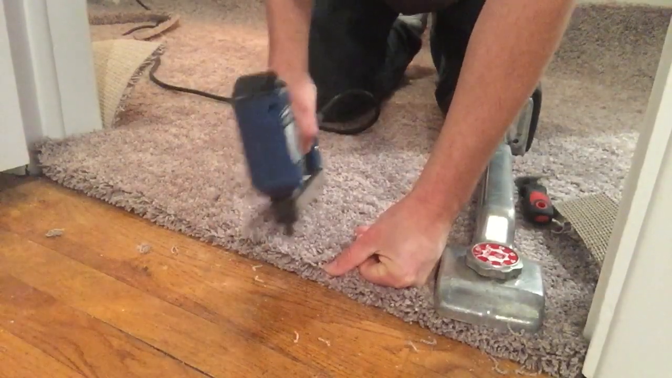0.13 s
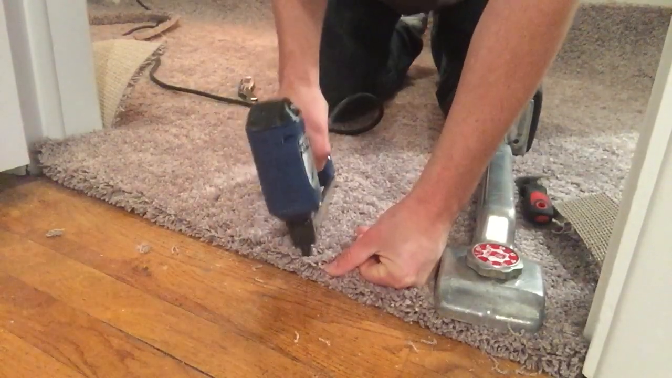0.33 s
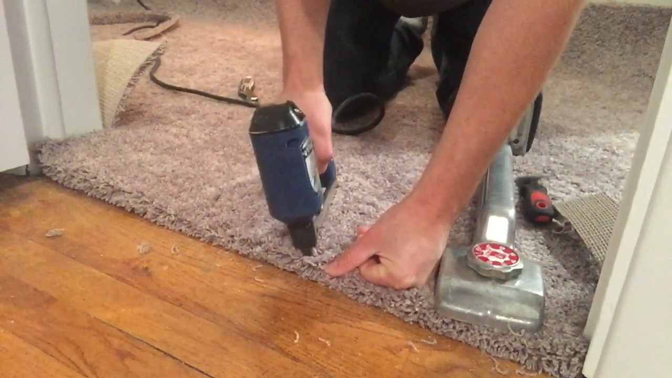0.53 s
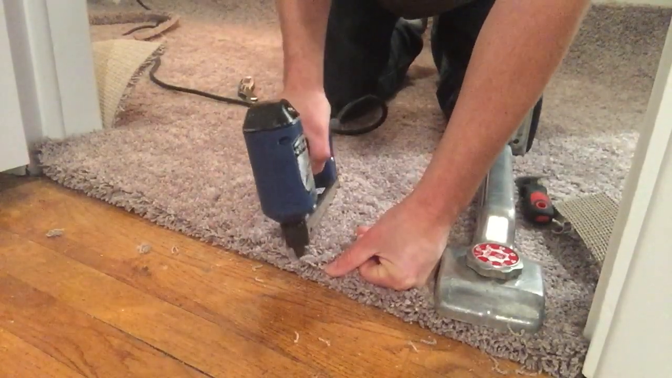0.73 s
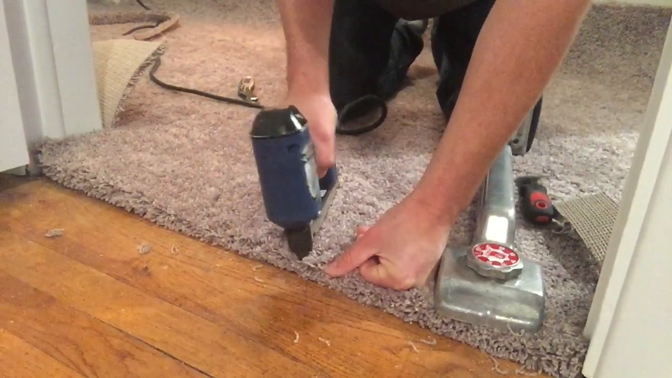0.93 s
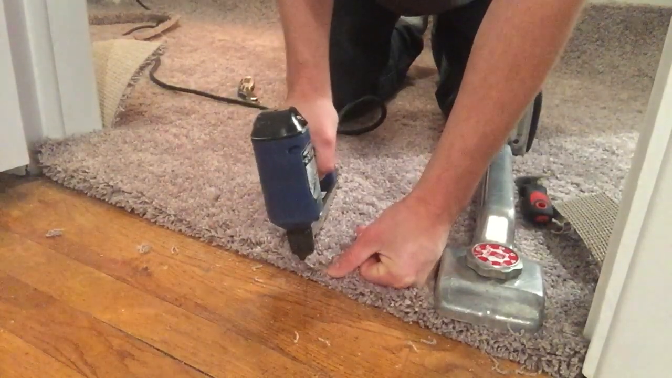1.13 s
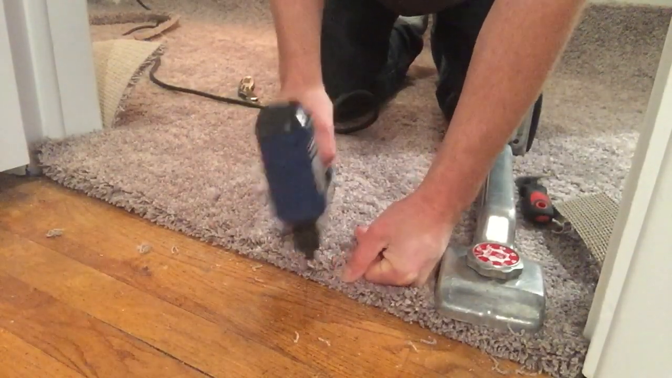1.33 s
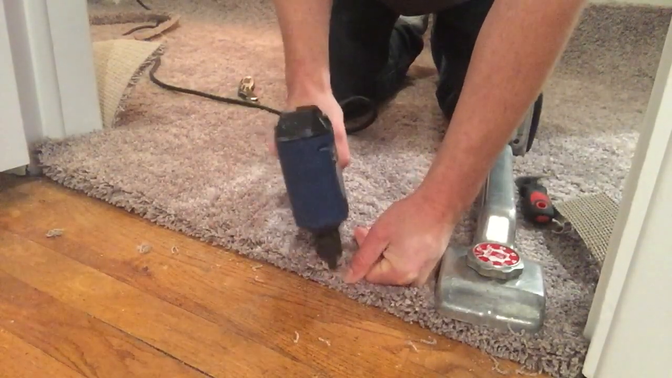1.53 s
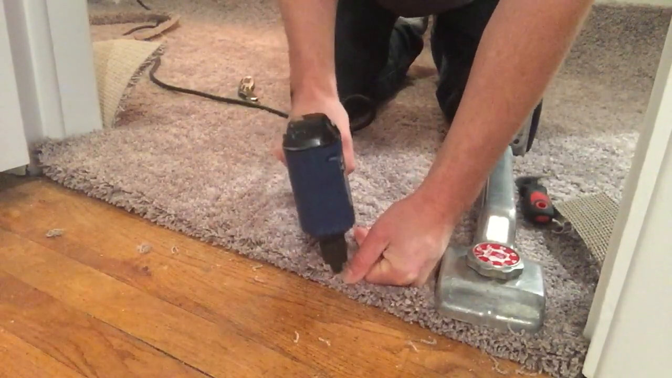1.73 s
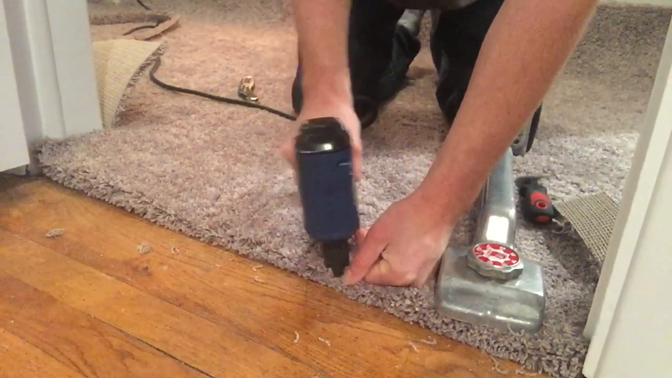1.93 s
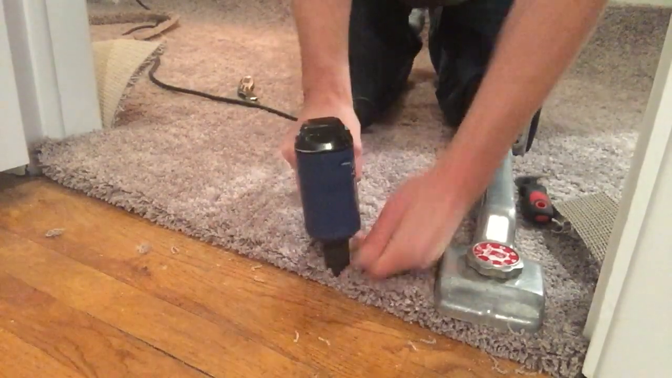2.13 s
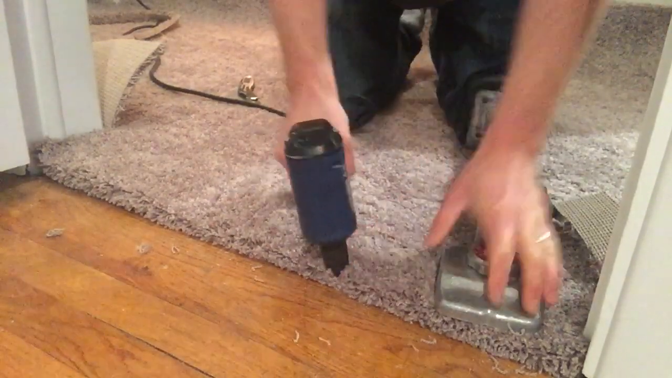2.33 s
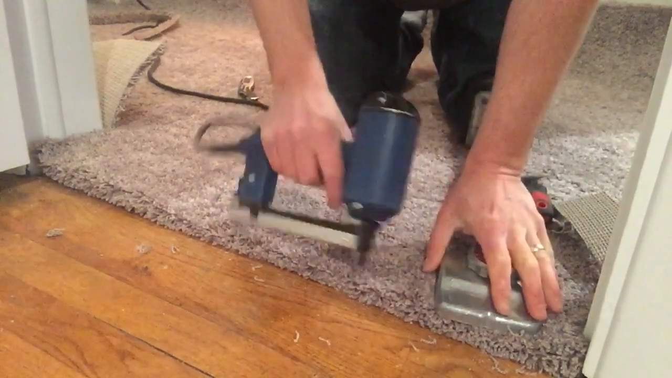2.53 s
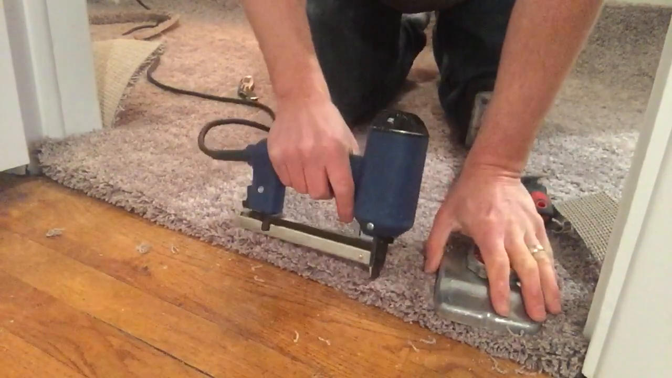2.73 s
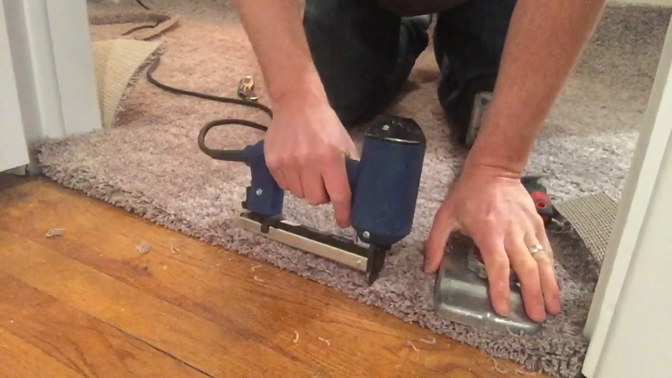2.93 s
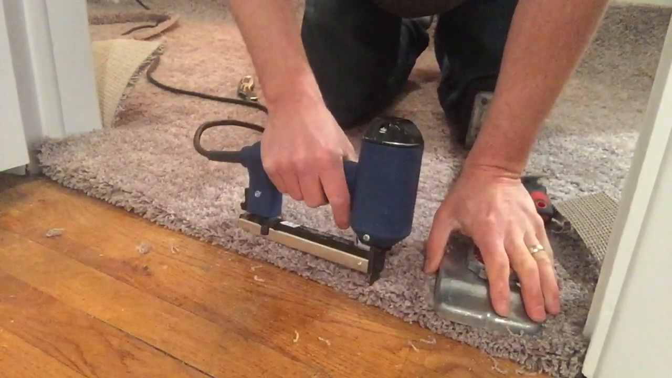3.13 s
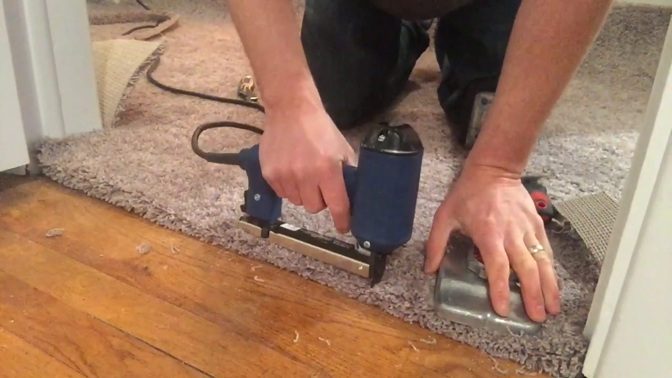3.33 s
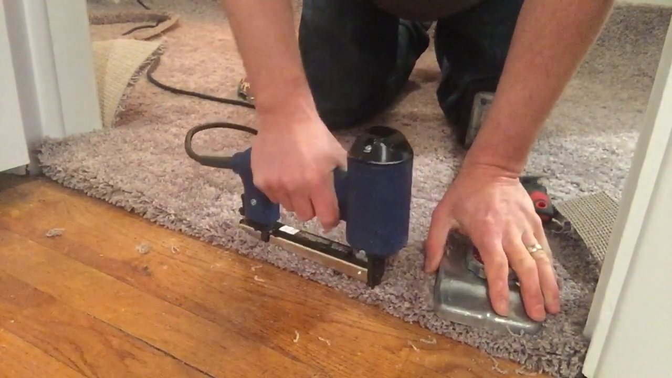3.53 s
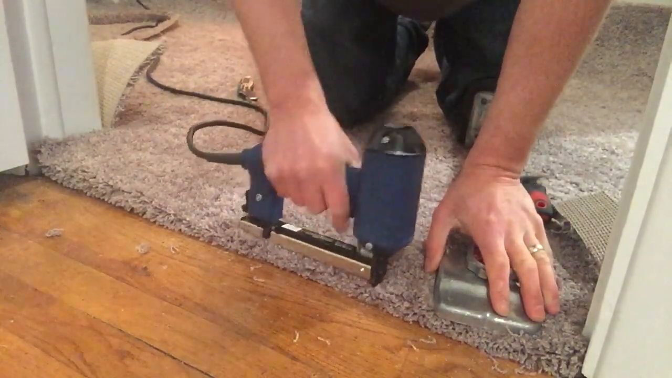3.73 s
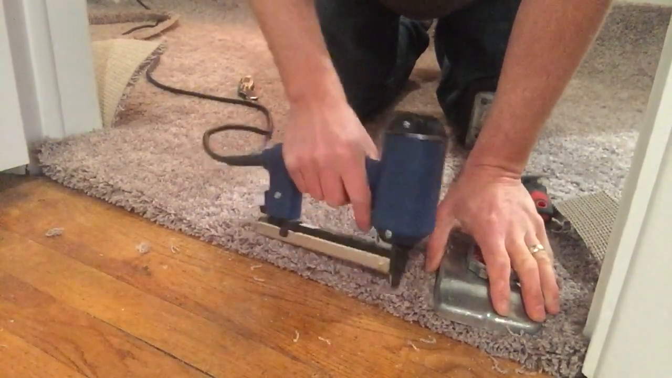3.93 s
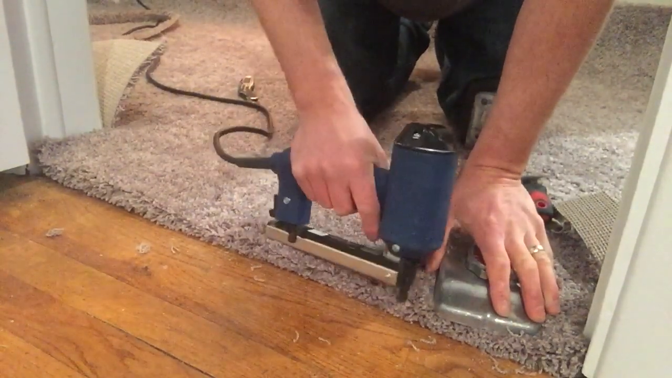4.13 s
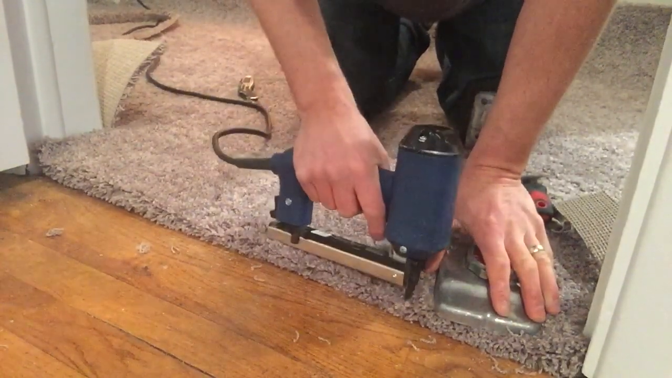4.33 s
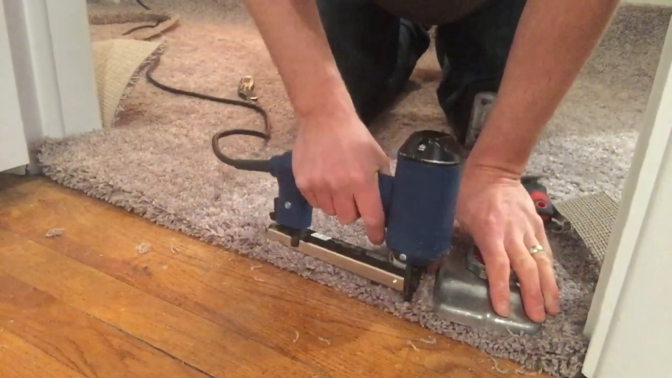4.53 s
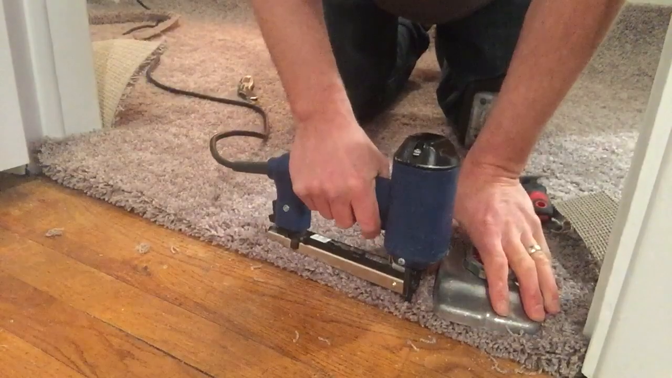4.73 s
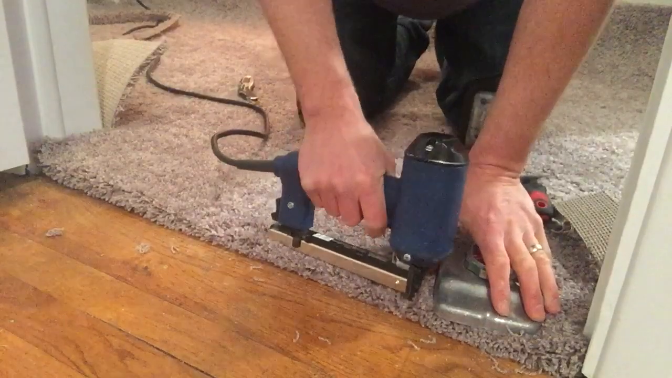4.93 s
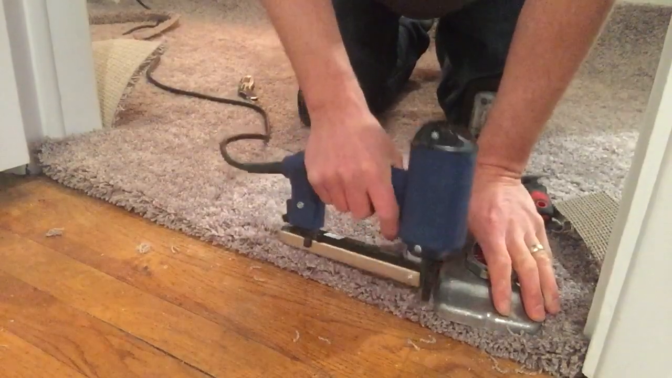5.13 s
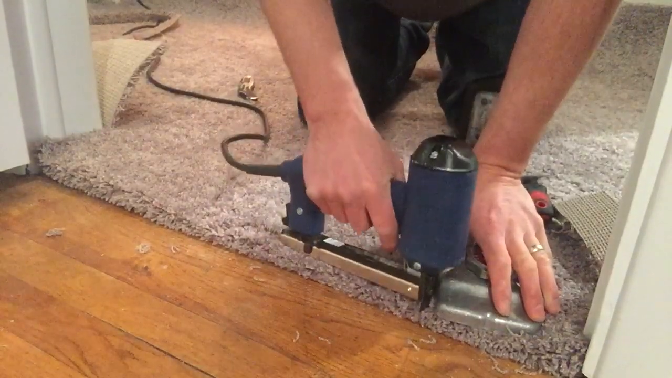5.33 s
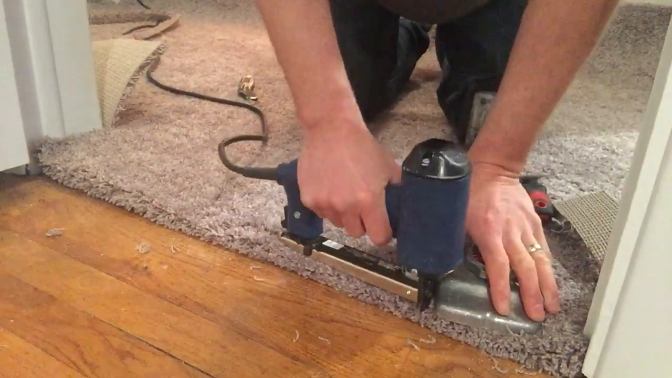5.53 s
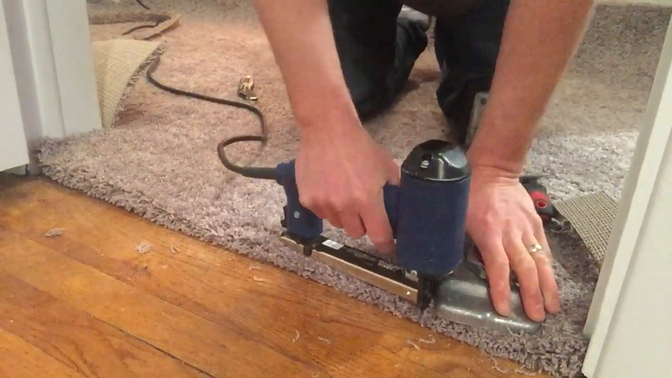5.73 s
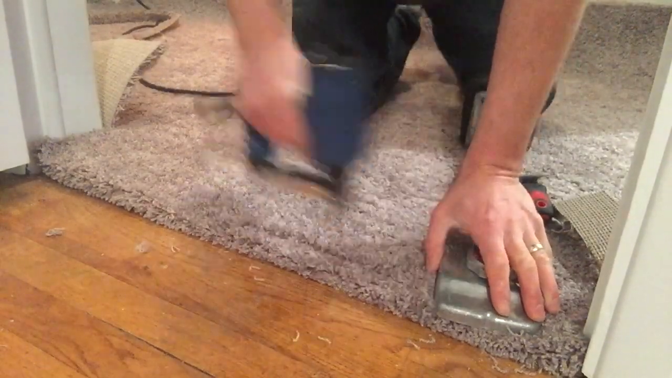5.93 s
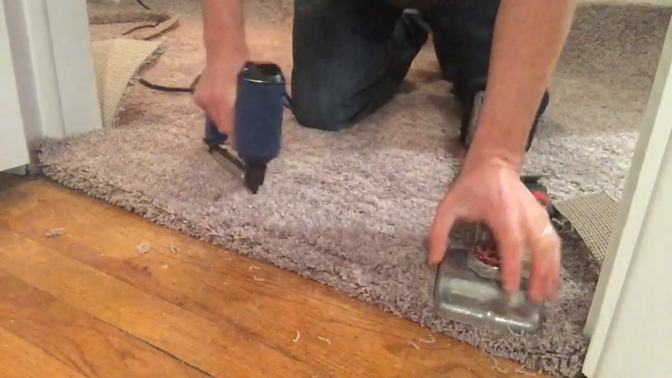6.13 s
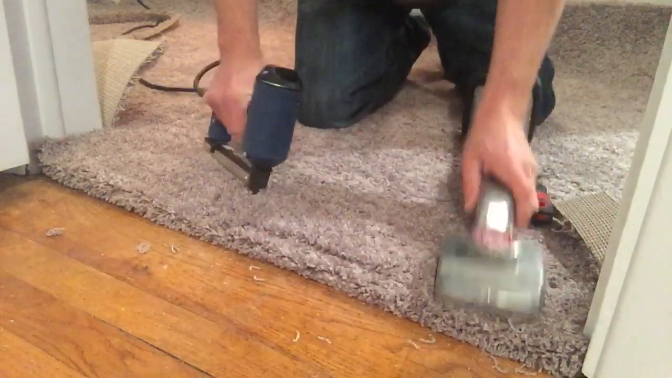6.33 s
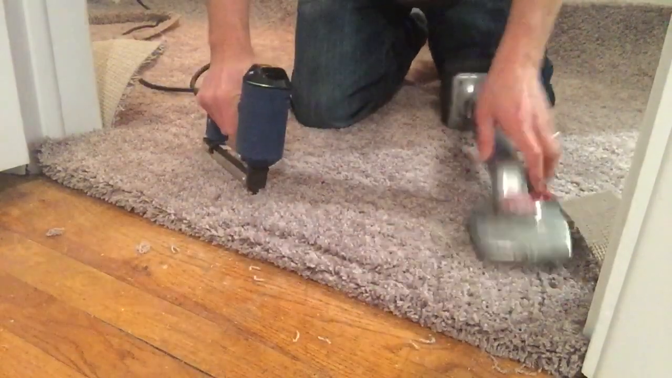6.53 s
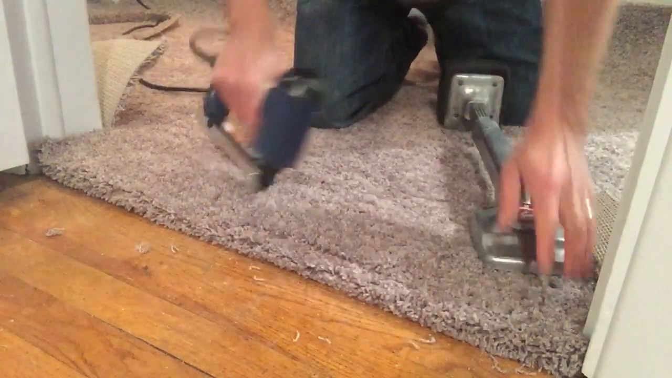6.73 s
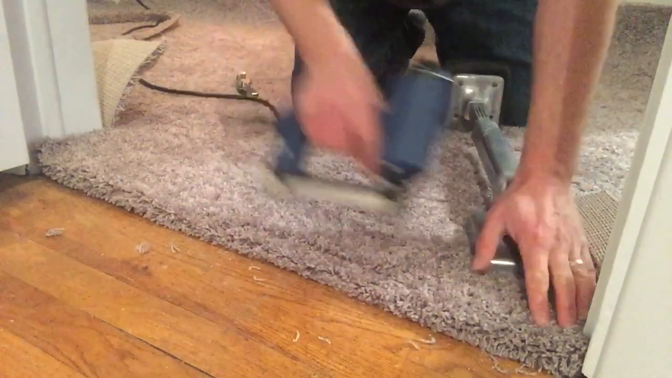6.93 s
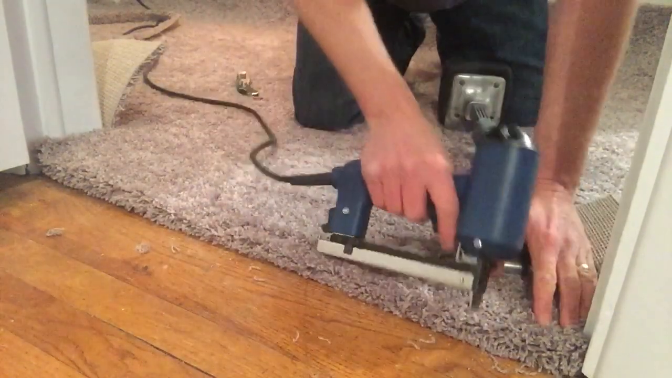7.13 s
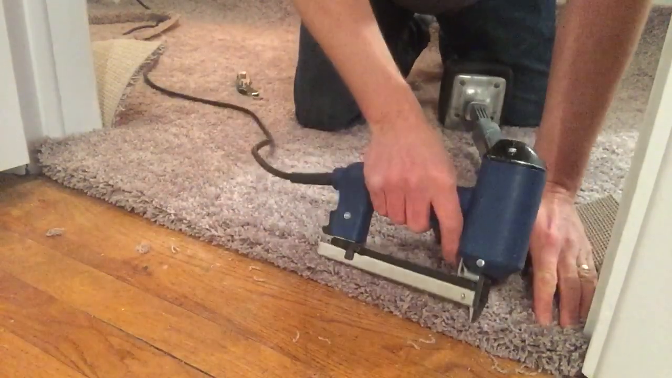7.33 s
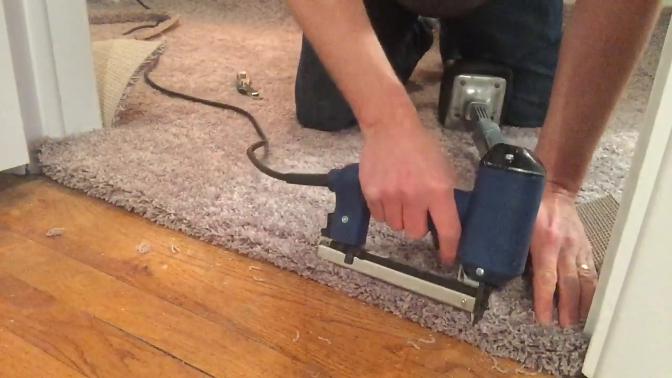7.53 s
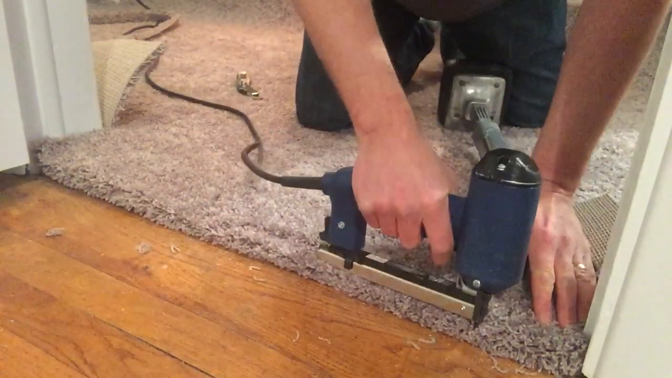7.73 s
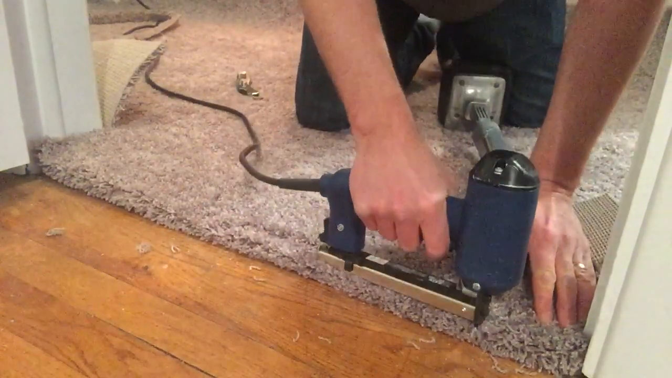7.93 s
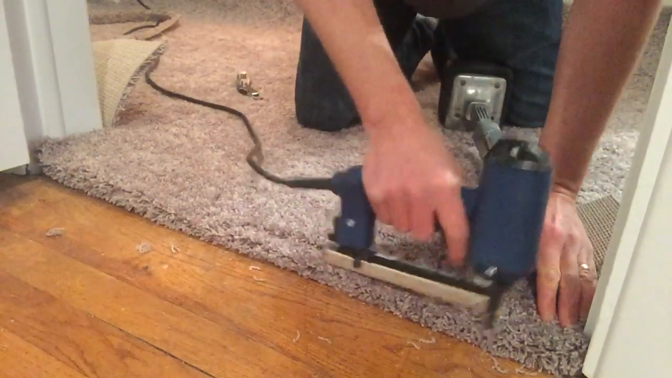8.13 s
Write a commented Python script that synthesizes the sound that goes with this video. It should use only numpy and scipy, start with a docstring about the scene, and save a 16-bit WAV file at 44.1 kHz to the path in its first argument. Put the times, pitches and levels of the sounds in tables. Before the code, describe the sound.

An electric staple gun fires sharp, booming shots into carpet in an echoing room, with a metal tool clanking once near the end.

```python
"""Carpet is tacked down at the doorway of a bare, wood-floored room, close to the microphone.
An electric staple gun is already firing as we come in, and five more shots follow. In each, the switch
snaps, the solenoid pulls, the driver shears off a staple and slams it home; the floor booms, the room
rings and the microphone overloads. Between shots the gun is handled. After six seconds
a metal knee kicker is lifted, clanks and is set down; near eight the gun fires once more."""
import sys
import numpy as np
from scipy import signal
from scipy.fft import rfft, irfft, next_fast_len
from scipy.io import wavfile

SR = 44100
rng = np.random.default_rng(int(sys.argv[2]) if len(sys.argv) > 2 else 0)


def dump(signal):
    """Clip the signal to [-1, 1] and save it as 16-bit WAV at the path in sys.argv[1]."""
    limited = np.clip(np.atleast_2d(signal).T, -1, 1)
    pcm = np.round(limited * 32767).astype(np.int16)
    wavfile.write(sys.argv[1], SR, pcm)


N = 361619
LEAD_IN = SR // 4   # samples ahead of time zero
SHORT_T, LONG_T = np.arange(SR // 5) / SR, np.arange(3 * SR // 2) / SR   # seconds since a blow


def from_db(db):
    """Decibels to gain."""
    return 10 ** (np.asarray(db) / 20)


def at_hz(points, hz):
    """Read a table on a log-frequency axis."""
    known_hz, values = np.array(points).T
    return np.interp(np.log(hz + 1e-9), np.log(known_hz), values)


def fade(t, t60):
    """Exponential decay by 60 dB in t60 seconds."""
    return np.exp(-np.log(1000) * t / t60)


def add(track, s, sound):
    """Mix a sound in at s seconds, on a track that starts LEAD_IN samples early."""
    start = LEAD_IN + round(s * SR)
    part = sound[:len(track) - start]
    track[start:start + len(part)] += part


def noise(spectrum, size):
    """Noise of a given colour, rms 1."""
    hz = np.fft.rfftfreq(size, 1 / SR)
    x = irfft(rfft(rng.standard_normal(size)) * from_db(at_hz(spectrum, hz)), size)
    return x / np.std(x)


def soften(x, top_hz):
    """A softer contact loses the treble."""
    return signal.sosfilt(signal.butter(1, min(top_hz, .45 * SR), fs=SR, output="sos"), x)


def burst(spectrum, rise, hold, t60):
    """A chattering contact builds up, grinds on for a moment and dies; times in seconds."""
    envelope = np.minimum(SHORT_T / rise, 1) * fade(np.maximum(SHORT_T - hold, 0), t60)
    return noise(spectrum, len(SHORT_T)) * envelope


def ring(modes, scatter_db, detune=.012):
    """Struck metal: scatter_db varies how a blow's force is shared; loose parts shift the pitches."""
    hz, db, t60 = np.array(modes).T[:, :, None]
    gain = from_db(db + scatter_db * rng.standard_normal(hz.shape)) * rng.choice([-1, 1], hz.shape)
    hz = hz * (1 + detune * rng.standard_normal(hz.shape))
    return np.sum(gain * np.sin(2 * np.pi * hz * SHORT_T) * fade(SHORT_T, t60), axis=0)


# The steady noises of the place. Each row: frequency in Hz, relative level in dB.
RUMBLE_SPECTRUM = [(25, -37.5), (55, -9), (85, 2), (135, -8.5), (220, -12.5), (330, -12.5), (450, -24.5),
                   (900, -31), (2000, -61)]
HISS_SPECTRUM = [(100, -1.5), (900, 0.5), (1600, -2), (3200, -5.5), (6500, -6), (10000, -13), (16000, -14)]

def room_tone(rumble_db=-56.5, hiss_db=-70.5):
    """A low indoor rumble and a faint hiss lie under everything."""
    size = next_fast_len(N)
    rumble = from_db(rumble_db) * noise(RUMBLE_SPECTRUM, size)
    hiss = from_db(hiss_db) * noise(HISS_SPECTRUM, size)
    return (rumble + hiss)[:N]


# The colour of the room's echoes. Each row: frequency in Hz, level in dB.
ECHO_SPECTRUM = [(100, -10.5), (220, -13), (400, -16), (650, -12.5), (1000, -7.5), (1600, -4), (2600, -10),
                 (3800, -7), (5200, -6.5), (7500, -9), (10500, -13), (15500, -12)]
# The room's reverberation. Each row: band centre in Hz, t60 in seconds.
ECHO_DECAYS = [(90, 1.05), (150, .8), (240, 1.1), (500, .95), (1500, .98), (2400, .88), (3800, .85),
               (5200, .61), (7000, .5), (9000, .4), (11500, .33), (15000, .28)]

def room(x, first_echo_s=.007, far_lag_s=.2, far_db=-8):
    """The near door frame and walls die quickly; the bare room beyond rings on, losing treble first."""
    hz = np.fft.rfftfreq(len(LONG_T), 1 / SR)
    spectrum = rfft(rng.standard_normal(len(LONG_T))) * from_db(at_hz(ECHO_SPECTRUM, hz))
    build_up = np.clip(LONG_T / first_echo_s - 1, 0, 1)
    near_walls = fade(LONG_T, t60=.2)
    # a late swell comes back from the far end of the house
    far_swell = 1 + from_db(far_db) * (LONG_T > far_lag_s) * fade(np.abs(LONG_T - far_lag_s), t60=.24)
    echoes = 0
    for centre, t60 in ECHO_DECAYS:
        band = at_hz([(f, f == centre) for f, _ in ECHO_DECAYS], hz)   # neighbouring bands cross-fade
        envelope = (fade(LONG_T, t60) * far_swell + near_walls) * build_up
        echoes = echoes + irfft(spectrum * band, len(LONG_T)) * envelope / np.linalg.norm(envelope)
    return signal.fftconvolve(x, echoes)[:len(x)]


def diffuse_field(directions=8):
    """A tool sends a different wave in each direction; each finds its own way to the microphone."""
    paths = [room(staple_gun() + from_db(-1) * knee_kicker() + floor_thud()) for _ in range(directions)]
    return sum(paths) / np.sqrt(directions)


# Faint rustles between shots. Each row: start in seconds, length in seconds, level in dB.
FAINT_RUSTLES = [(3.957, 0.11, -56), (4.187, 0.12, -63.5), (5.25, 0.11, -59), (6.175, 0.065, -56.5),
                 (6.977, .05, -64), (7.04, 0.065, -61.5)]
# Their colour. Each row: frequency in Hz, relative level in dB.
RUSTLE_SPECTRUM = [(500, -3), (3000, 8.5), (7500, 1), (10000, -6), (12500, -2.5), (16000, -21)]

def rustling():
    """Faint, high, sizzling rustles in short soft swells."""
    out = np.zeros(LEAD_IN + N)
    for s, length, db in FAINT_RUSTLES:
        size = round(length * SR)
        add(out, s, from_db(db) * noise(RUSTLE_SPECTRUM, size) * np.hanning(size))
    return out


def click(hz, snap_db):
    """A small part knocks: one broad, quickly damped resonance and a short snap."""
    colour = [(hz / 8, -60), (hz / 2, -42), (hz, 0), (hz * 2, -27), (hz * 4, -60)]
    body = burst(colour, rise=.0002, hold=.0024, t60=.021)
    return body + from_db(snap_db) * burst(SHEAR_SPECTRUM, rise=.0002, hold=.0006, t60=.012)


# Dull knocks of the grip and bright ticks of metal. Each row: start in seconds, level in dB.
GRIP_KNOCKS = [(2.5145, -47), (2.712, -32.5), (4.690, -53), (6.226, -47), (6.5677, -26.5), (7.2183, -45.5),
               (7.39, -63)]
METAL_TICKS = [(1.376, -48), (2.472, -63), (3.412, -66), (4.6891, -51), (5.038, -48), (5.391, -58),
               (6.58, -48), (7.776, -65)]

def handling(trigger_lead_s=.0215):
    """The trigger clicks just before the switch closes; between shots housings knock, loose parts tick."""
    out = np.zeros(LEAD_IN + N)
    for s, switch_lead, trigger_db, *_ in GUN_SHOTS:
        add(out, s - switch_lead - trigger_lead_s, from_db(trigger_db) * click(hz=3450, snap_db=-15))
    for s, db in GRIP_KNOCKS:
        add(out, s, from_db(db) * click(hz=1474, snap_db=-26))
    for s, db in METAL_TICKS:
        add(out, s, from_db(db) * click(hz=9200, snap_db=3))
    return out


def floor_blows():
    """Everything that hits the floor. Each row: time in seconds, joist and board levels in dB."""
    return [(row[0], row[-2], row[-1]) for row in GUN_SHOTS + KICKER_LANDINGS]


def footing_db(hz, joist_db, board_db, crossover_hz=105):
    """Joists carry the deepest sound, boards the rest; their levels depend on where the blow lands."""
    joist_share = 1 / (1 + (hz / crossover_hz) ** 8)
    return joist_share * joist_db + (1 - joist_share) * board_db


# The shaking boards. Each row: frequency in Hz, relative level in dB.
THUD_SPECTRUM = [(25, -29), (55, -7), (90, 1.5), (135, 5.5), (180, -11), (250, -1.5), (330, -19),
                 (450, -13.5), (900, -36), (3000, -64)]

def floor_thud(gain_db=3):
    """Farther from the microphone the many boards shake out of step in a rough thud."""
    out = np.zeros(LEAD_IN + N)
    for s, joist_db, board_db in floor_blows():
        colour = [(hz, db + footing_db(hz, joist_db, board_db)) for hz, db in THUD_SPECTRUM]
        strength = np.hypot(from_db(joist_db), from_db(board_db)) / np.sqrt(2)
        add(out, s, from_db(gain_db) * strength * burst(colour, rise=.002, hold=.0085, t60=.038))
    return out


# The floor and the standing waves it drives. Each row: pitch in Hz, relative level in dB, t60 in seconds.
FLOOR_RESONANCES = [(59.7, -28, 1.3), (67.7, -10.5, 0.16), (87.9, -27, 1.6), (101.07, -11, 0.17),
                    (106.5, -28, 1.4), (124.6, -11.5, 0.23), (138.8, -22, 0.84), (150.7, -19, 0.23),
                    (195, -35, 0.43), (217.5, -12.5, 0.26), (225, -35, 1.7), (236, -30, 1.67),
                    (286, -19, 0.17), (292.4, -35.5, 1.3), (352, -13.5, 0.083), (432, -7.5, 0.066),
                    (453.6, -10.5, 0.072), (466, -37.5, 0.44), (523, -17.5, 0.13)]

def floor_boom(rise_s=.0017, scatter_db=2):
    """Each blow passes through the carpet and sets the wooden floor's modes swinging."""
    hz, db, t60 = np.array(FLOOR_RESONANCES).T[:, :, None]
    sign = (-1) ** (np.arange(len(hz))[:, None] // 2)   # polarity flips every second mode
    modes = sign * np.sin(2 * np.pi * hz * LONG_T) * fade(LONG_T, t60) * (1 - np.exp(-LONG_T / rise_s))
    out = np.zeros(LEAD_IN + N)
    for s, joist_db, board_db in floor_blows():
        gain = from_db(db + footing_db(hz, joist_db, board_db) + scatter_db * rng.standard_normal(hz.shape))
        add(out, s, np.sum(gain * modes, axis=0))
    return out


# The kicker's head and shaft. Each row: pitch in Hz, relative level in dB, t60 in seconds.
KICKER_RESONANCES = [(1458, -12, 0.062), (1647, -7, 0.029), (2003, -4, 0.027), (2290, -14, 0.024),
                     (2390, -2.5, 0.011), (2860, 1, 0.013), (3570, -4, 0.031), (4000, -10, 0.075),
                     (5370, -9, 0.041), (5630, -6, 0.028), (6200, -7.5, 0.039), (6800, -12, 0.051),
                     (7640, -12, 0.048), (12360, -3, 0.026)]
# A bare clank and a clack on carpet. Each row: frequency in Hz, relative level in dB.
CLANK_SPECTRUM = [(200, -32), (700, -2), (1800, 2), (3500, 3), (6000, -5), (10000, -2.5), (14000, -6),
                  (16000, 1.5)]
CLACK_SPECTRUM = [(200, -22), (950, -16), (1450, -1.5), (2150, -1), (2550, -9.5), (5400, -11), (8000, -21),
                  (16000, -41)]
# The kicker moved. Each row: start in seconds, level in dB, treble cutoff in Hz, hum offset in dB.
KICKER_CLANKS = [(6.2942, -10, 17500, 5), (6.6014, -20, 7800, -5), (6.6648, -24, 9000, -22)]
# The kicker set down. Each row: start in seconds, then clack, joist and board levels in dB.
KICKER_LANDINGS = [(6.6476, -12.5, -20.5, -33)]

def knee_kicker(shaft_hz=657, shaft_db=-19, grip_after_s=.045, sink_s=.00425):
    """The loose head clanks on its shaft, which hums until the grip stills it; the head lands on carpet."""
    out = np.zeros(LEAD_IN + N)
    grip = fade(np.maximum(SHORT_T - grip_after_s, 0), t60=.018)
    hum = np.sin(2 * np.pi * shaft_hz * SHORT_T) * fade(SHORT_T, t60=.45) * grip
    for s, db, cutoff_hz, hum_db in KICKER_CLANKS:
        contact = burst(CLANK_SPECTRUM, rise=.0002, hold=.00082, t60=.032)
        head = contact + from_db(-6) * ring(KICKER_RESONANCES, scatter_db=1, detune=.005)
        add(out, s, from_db(db) * (soften(head, cutoff_hz) + from_db(shaft_db + hum_db) * hum))
    for s, db, _, _ in KICKER_LANDINGS:
        # the pile cushions the contact: it builds up over a few milliseconds and favours the low modes
        head = ring(KICKER_RESONANCES, scatter_db=2.5, detune=.0067)
        cushioned = soften(soften(head, top_hz=2800), top_hz=2800)
        add(out, s, from_db(db) * burst(CLACK_SPECTRUM, rise=sink_s, hold=.0016, t60=.027))
        add(out, s + sink_s / 2, from_db(db + 2.5) * cushioned)
    return out


def plunger(travel_s, swell_db=13):
    """The gun's plunger rubs in its coil, louder as it gathers speed."""
    t = SHORT_T[SHORT_T < travel_s]
    rub = noise(SLAM_SPECTRUM, len(t)) * from_db(swell_db * (t / travel_s - 1.5))
    return soften(rub, top_hz=6000)


# The gun's steel and housing. Each row: pitch in Hz, relative level in dB, t60 in seconds.
GUN_RESONANCES = [(623, -9.5, 0.086), (1110, -11.5, 0.025), (1390, -3, 0.013), (1990, -10, 0.044),
                  (2170, -20.5, 0.013), (2810, -13.5, 0.073), (3265, -10.5, 0.065), (3290, -6.5, 0.014),
                  (3520, -16.5, 0.01), (5900, -12, 0.057), (7500, -25, 0.068), (9880, -12.5, 0.019),
                  (11500, -15, 0.027), (14400, -16, .025)]
# The switch, the shearing staple and the driver's slam. Each row: frequency in Hz, relative level in dB.
SWITCH_SPECTRUM = [(300, -19), (1200, -6.5), (3600, -1), (5000, -5), (9000, -16), (16000, -11)]
SHEAR_SPECTRUM = [(40, -35.5), (300, -13), (1200, -3), (3500, -1), (5000, -8.5), (9000, -4.5), (16000, -10)]
SLAM_SPECTRUM = [(40, -31.5), (150, -1.5), (400, 3), (1400, 2), (3500, 0.5), (4800, -6.5), (7000, -6),
                 (10000, -12.5), (16000, -14.5)]
# The shots at the doorway. Each row: time of the slam in seconds, the switch's lead in seconds,
# then trigger, slam, joist and board levels in dB.
GUN_SHOTS = [(-.022, 0.025, -62.5, -1.5, 0.5, -0.5), (1.2148, .027, -46, 2, -1, -12),
             (2.081, .0284, -44.5, 1, -1.5, 4.5), (3.6648, 0.033, -43, 1, -3, 3),
             (4.8809, .0352, -58, 1.5, -1.5, 2.5), (5.6651, 0.037, -62.5, 1.5, 2, 0.5),
             (7.964, .033, -57.5, 1.5, -6, .5)]

def staple_gun(latch_lag_s=.012, travel_s=.016, shear_lead_s=.004, return_lag_s=.031):
    """Switch, latch, plunger run, staple sheared off its strip, slam, and the spring's return stroke."""
    out = np.zeros(LEAD_IN + N)
    for s, switch_lead, _, slam_db, _, _ in GUN_SHOTS:
        switch = burst(SWITCH_SPECTRUM, rise=.0001, hold=.0025, t60=.036)
        add(out, s - switch_lead, from_db(-28.5) * switch)
        latch = burst(SHEAR_SPECTRUM, rise=.0003, hold=.00089, t60=.01)
        add(out, s - switch_lead + latch_lag_s, from_db(-31.5) * latch)
        add(out, s - shear_lead_s - travel_s, from_db(-21) * plunger(travel_s))
        shear = burst(SHEAR_SPECTRUM, rise=.0017, hold=.0015, t60=.025)
        add(out, s - shear_lead_s, from_db(-5) * shear)
        slam = burst(SLAM_SPECTRUM, rise=.00027, hold=.004, t60=.023)
        steel = from_db(-3) * ring(GUN_RESONANCES, scatter_db=0)
        add(out, s, from_db(slam_db) * (slam + steel))
        spring = burst(SWITCH_SPECTRUM, rise=.001, hold=.0043, t60=.065)
        add(out, s + return_lag_s, from_db(-24) * spring)
    return out


def scene():
    """One microphone hears the tools close by and again through the room, over the room tone."""
    clicks = handling()
    direct = staple_gun() + knee_kicker() + floor_boom() + clicks + rustling()
    echoes = diffuse_field() + from_db(-9) * room(clicks)
    return ((direct + echoes)[LEAD_IN:] + room_tone())[None]


def record(dry, ceiling=.93, cutoff_hz=15900):
    """The slams overload the microphone's input; a steep low-pass cuts the top."""
    clipped = np.clip(dry, -ceiling, ceiling)
    return signal.sosfilt(signal.ellip(10, .1, 70, cutoff_hz, fs=SR, output="sos"), clipped)


dry = scene()
out = record(dry)
dump(out)
```